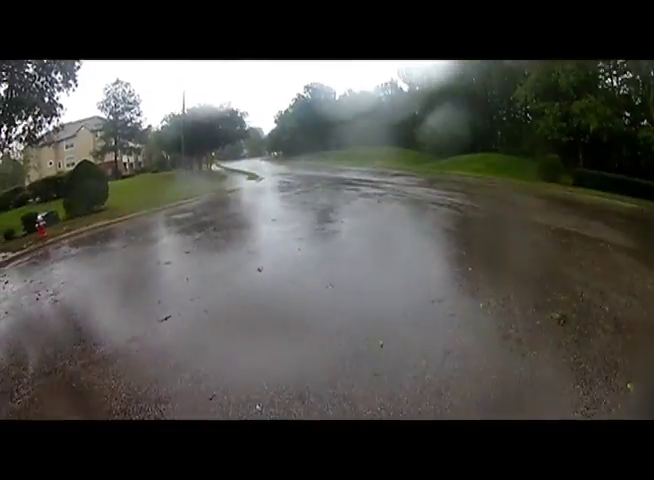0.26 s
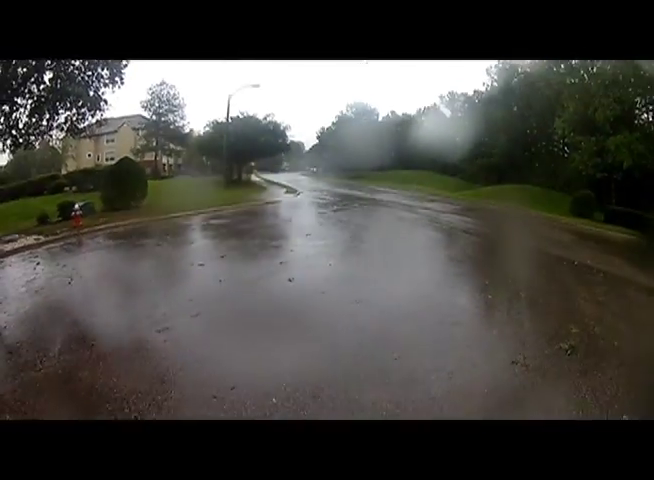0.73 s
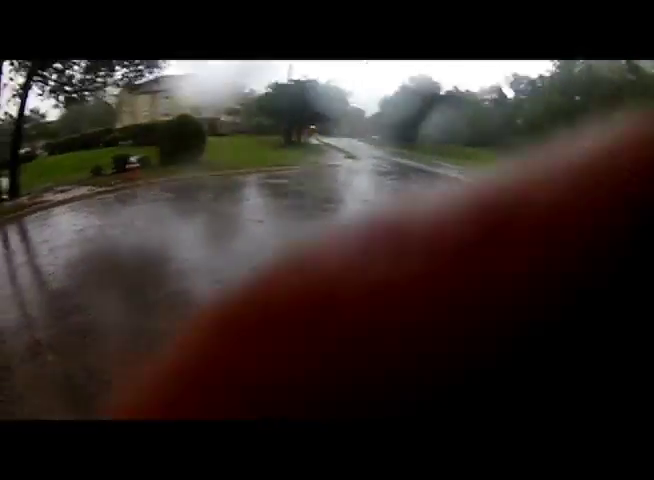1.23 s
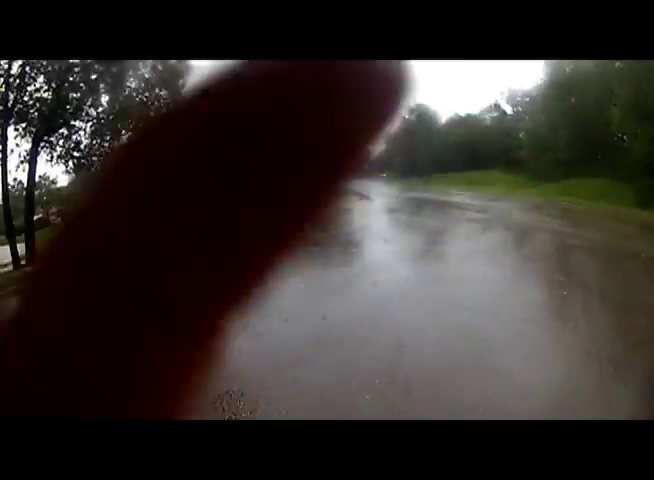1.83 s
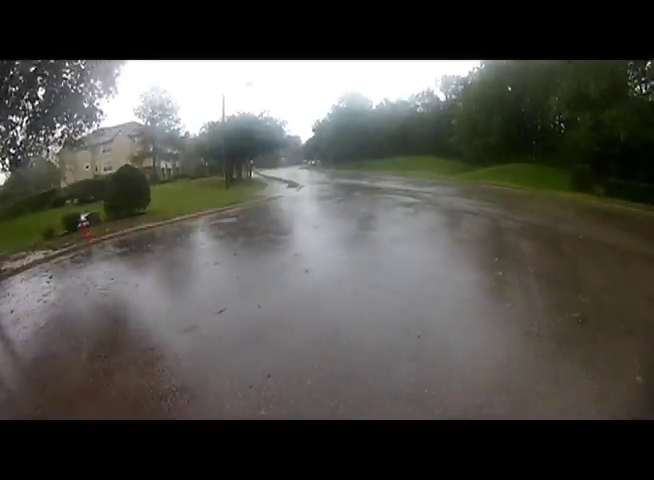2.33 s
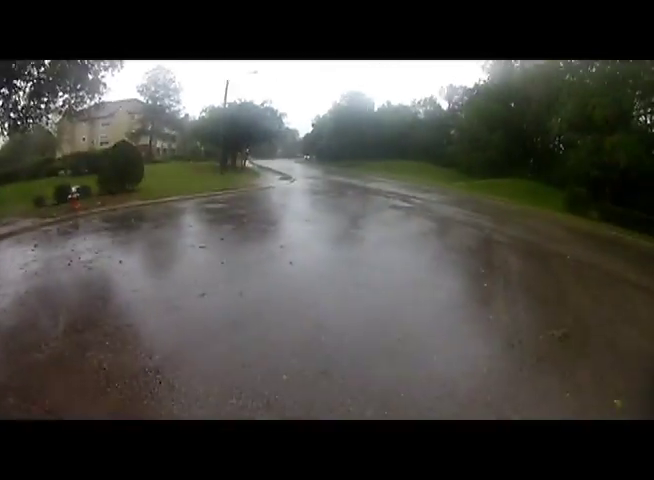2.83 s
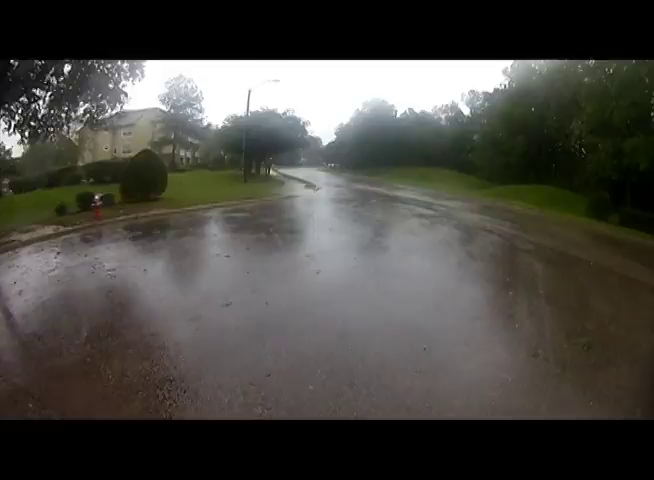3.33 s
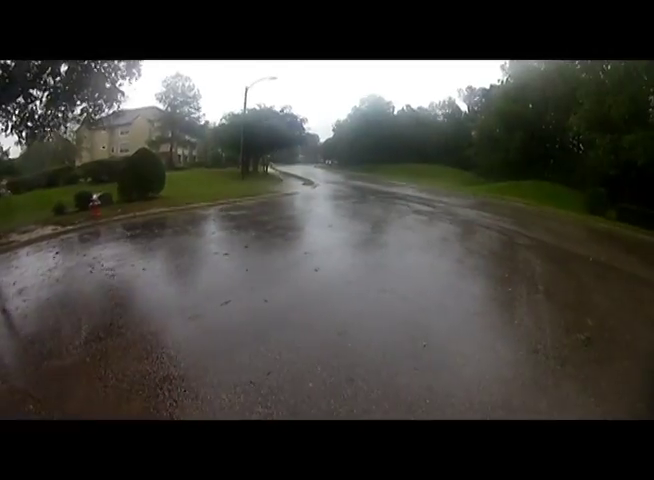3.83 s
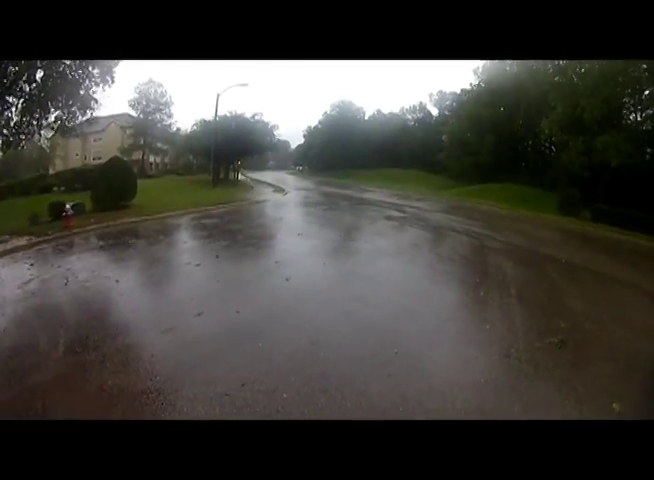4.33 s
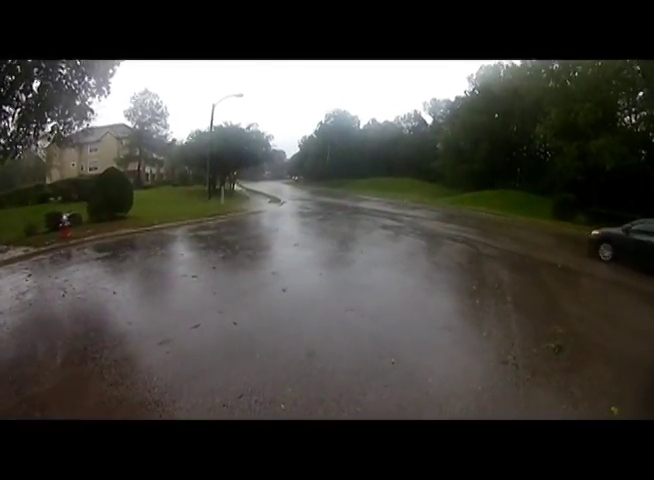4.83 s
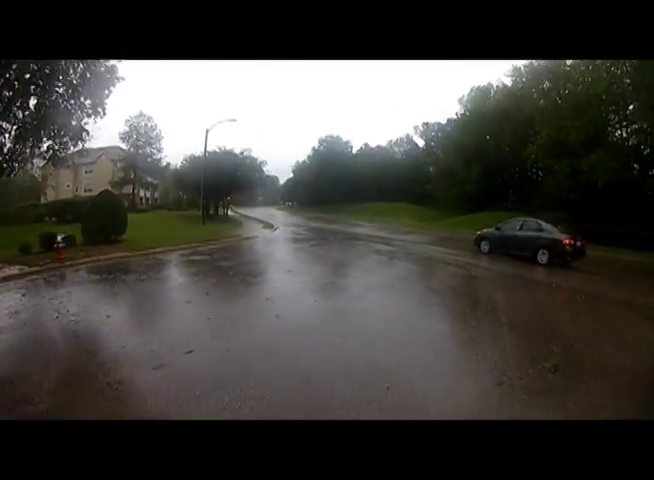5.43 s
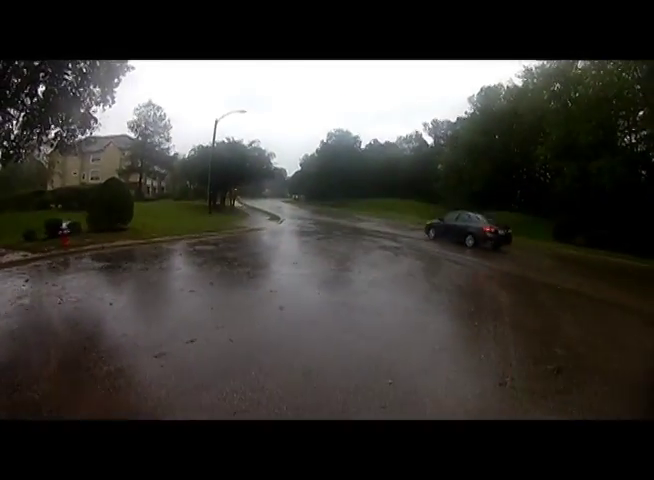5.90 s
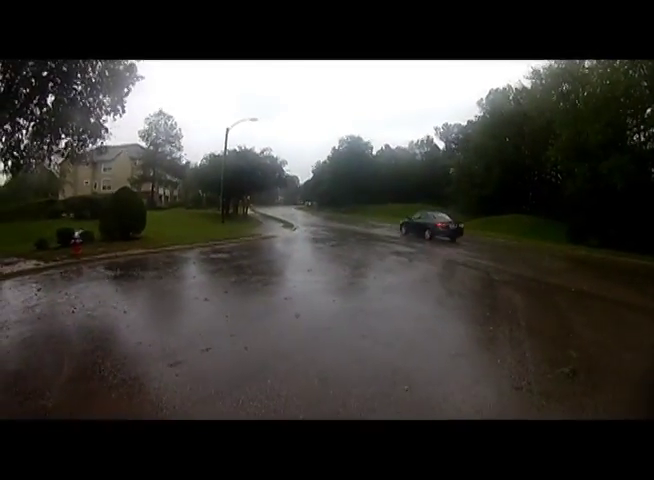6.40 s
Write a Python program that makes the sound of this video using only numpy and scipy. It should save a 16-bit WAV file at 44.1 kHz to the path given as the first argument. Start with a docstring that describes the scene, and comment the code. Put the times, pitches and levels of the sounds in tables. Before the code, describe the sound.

Hollow plastic knocks and dull thumps from fingers on a sealed camera housing, hardest around two to three and a half seconds, over faint muffled rain.

```python
"""Knocks on a sealed housing in the rain

A small camera in a sealed plastic housing is held out in the rain on a quiet street.
Fingers and drops knock on the shell, ringing its damped modes; the grip thumps the air inside,
scrapes and short crunches are stick-slip clicks, and hard blows ring a metal latch and overload the input.
Rain, wet road and wind are shaped noise, muffled by the housing, over faint hiss and hum."""
import sys
import numpy as np
from scipy import signal
from scipy.fft import rfft, irfft, next_fast_len
from scipy.io import wavfile

SR = 44100
rng = np.random.default_rng(int(sys.argv[2]) if len(sys.argv) > 2 else 0)


def file_out(sig):
    """Save sig as 16-bit WAV at sys.argv[1]."""
    # one column per channel
    cols = np.atleast_2d(sig).T
    # limit, then scale
    lim = np.clip(cols, -1, 1)
    pcm = np.round(lim * 32767).astype(np.int16)
    wavfile.write(sys.argv[1], SR, pcm)


N = 293838  # length in samples


def from_db(db):
    """Logarithmic level: decibels to amplitude gain."""
    return 10 ** (np.asarray(db) / 20)


def rms_one(x):
    """Normalisation: the signal scaled to rms 1."""
    return x / np.sqrt(np.mean(x ** 2) + 1e-20)


def add(track, start_s, sound):
    """Superposition: lays a sound on the track from start_s."""
    i = int(round(start_s * SR))
    track[i:i + len(sound)] += sound[:N - i]


def in_time(rows):
    """Linear interpolation: the columns of a time curve, one value per sample."""
    time_s, *columns = np.transpose(rows)
    return [np.interp(np.arange(N) / SR, time_s, column) for column in columns]


def drift(rate_hz):
    """Low-passed noise: a slow random wander of rms 1, computed at every 40th sample."""
    pole = np.exp(-2 * np.pi * rate_hz * 40 / SR)
    noise = rng.standard_normal(N // 40 + 2002)
    slow = signal.lfilter([1], [1, -2 * pole, pole * pole], noise)[2000:]  # drop the settling
    return np.interp(np.arange(N) / 40, np.arange(len(slow)), rms_one(slow))


def coloured(x, spectrum, peaks=()):
    """Spectral shaping: x through a log-frequency curve lifted at resonances, then rms 1."""
    size = next_fast_len(N)
    hz, db = np.transpose(spectrum)
    bins = np.arange(1, size // 2 + 2) * SR / size
    shape_db = np.interp(np.log(bins), np.log(hz), db)
    for centre_hz, width_hz, lift_db in peaks:
        shape_db = shape_db + lift_db / (1 + (2 * (bins - centre_hz) / width_hz) ** 2)
    return rms_one(irfft(rfft(x, size) * from_db(shape_db), size)[:N])


def grains(per_s, spread_db):
    """Random impulse process: clicks at chance moments, of uneven size and sign."""
    size_db = spread_db * np.minimum(rng.exponential(1, N), 5)
    sizes = from_db(size_db) * rng.choice([-1, 1], N)
    return sizes * (rng.random(N) < per_s / SR)


# preamplifier noise, relative spectrum: pitch_hz [Hz], level_db [dB]
HISS_SPECTRUM = [(2000, -14.5), (6000, -8), (11000, -3.5), (13000, -5.5), (16000, -0.5)]
# hum lines, before their slow wander: pitch_hz [Hz], level_db [dB rms]
HUM_LINES = [(120, -70), (240, -72.5)]
HISS_DB = -78  # rms


def electronics():
    """Circuit noise: shaped random hiss and sine lines of hum that wander in level."""
    t = np.arange(N) / SR
    hiss = from_db(HISS_DB) * coloured(rng.standard_normal(N), HISS_SPECTRUM)
    hum = np.zeros(N)
    for pitch_hz, level_db in HUM_LINES:
        gain = np.sqrt(2) * from_db(level_db + 4.1 * drift(2.9))
        hum += gain * np.sin(2 * np.pi * pitch_hz * t)
    return hiss + hum


# rain and wet road, relative spectrum: pitch_hz [Hz], level_db [dB]
RAIN_SPECTRUM = [(88, -38.5), (150, -14), (243, -8), (264, -11.5), (345, -10), (414, -14), (450, -17),
                 (1070, -3.5), (1330, -13), (2150, -17), (8000, -37.5), (10400, -67), (17600, -120)]
# fine spray, relative spectrum: pitch_hz [Hz], level_db [dB]
SPRAY_SPECTRUM = [(2000, -33), (4000, 1.5), (5000, -5), (6500, -10), (7800, -14), (9500, -8.5),
                  (11500, -31)]
# housing resonances that colour the outside air: pitch_hz [Hz], width_hz [Hz], lift_db [dB]
CAVITY_RESONANCES = [(1093, 90, 7.5), (1550, 60, 4), (2126, 50, 7), (2520, 70, 8), (2880, 400, 6),
                     (3980, 150, 8.5), (4590, 420, 7.5), (5530, 510, 4.5)]
# levels of the outside air: time_s [s], rain_and_road_db [dB rms], spray_db [dB rms]
OUTSIDE_LEVELS = [(0, -68.5, -78), (.3, -63.5, -77.5), (1.0, -62, -80), (1.35, -57.5, -78), (2.0, -56, -74),
                  (2.4, -61, -77), (3.1, -56, -78.5), (3.25, -57.5, -69.5), (3.5, -59, -70),
                  (3.9, -59.5, -72), (4.3, -59, -88), (5.2, -59, -96), (5.9, -59.5, -78),
                  (6.66, -61.5, -81)]


def outside_air():
    """Resonant transmission: rain, wet road and spray as noise coloured by the housing cavity."""
    rain_db, spray_db = in_time(OUTSIDE_LEVELS)
    wash = rng.standard_normal(N) * from_db(.8 * drift(20.0))
    patter = wash + .3 * rms_one(grains(260.0, spread_db=5.0))  # small drops over the wash
    rain = coloured(patter, RAIN_SPECTRUM, CAVITY_RESONANCES)
    spray = coloured(rng.standard_normal(N), SPRAY_SPECTRUM, CAVITY_RESONANCES)
    return from_db(rain_db) * rain + from_db(spray_db) * spray


# rumble of wind and grip, relative spectrum: pitch_hz [Hz], level_db [dB]
RUMBLE_SPECTRUM = [(12, -3.5), (35, -2), (80, -7), (140, -15), (300, -37.5), (600, -72.5)]
# creeping skin, relative spectrum: pitch_hz [Hz], level_db [dB]
CREEP_SPECTRUM = [(80, -18.5), (240, -1), (500, -3), (900, 1.5), (1300, -12.5), (3000, -40), (6000, -59)]
# unrest of the hand and wind, as rumble: time_s [s], level_db [dB rms]
UNREST_LEVELS = [(0, -60), (.91, -51), (1.24, -32.5), (1.47, -46), (1.8, -33.5), (2.17, -50.5), (2.56, -35),
                 (2.67, -42.5), (2.86, -36.5), (3.17, -39.5), (3.3, -52), (3.5, -47.5), (3.62, -37),
                 (4.06, -56.5), (4.3, -34.5), (4.5, -50.5), (5.62, -52), (5.92, -46), (6.66, -56.5)]
CREEP_DB, CREEP_FOLLOWS = -59.5, .4  # level at a rumble of -49.5 dB; share of the rumble's swing


def unrest():
    """Amplitude modulation: lumpy low noise of wind and grip, and clicks of skin creeping on the shell."""
    rumble_db, = in_time(UNREST_LEVELS)
    creep_db = CREEP_DB + CREEP_FOLLOWS * (rumble_db + 49.5)
    lumps = rng.standard_normal(N) * from_db(1.5 * drift(22.0))
    clicks = grains(900.0, spread_db=3.0) * from_db(3.5 * drift(14.0))
    rumble, creep = coloured(lumps, RUMBLE_SPECTRUM), coloured(clicks, CREEP_SPECTRUM)
    return from_db(rumble_db) * rumble + from_db(creep_db) * creep


# modes of the shell before the hand damps them, lowest first: pitch_hz [Hz], level_db [dB], t60_s [s]
SHELL_MODES = [(241.2, 0, 0.072), (408, -2.5, 0.027), (493, 0.5, 0.021), (660, -1.5, 0.022),
               (855, -3.5, 0.023), (1048.5, -2.5, 0.03), (1300, -8.5, .028), (1478, -8, 0.026),
               (1720, -10.5, .025), (2266, -8, .02), (2530, -15, .016), (2930, -16, .014),
               (3474, -12, 0.014), (3730, -34, .02), (4400, -22, 0.0062), (5400, -30, 0.016),
               (6500, -26, 0.0038)]


def shell(force, longest_s):
    """Modal filtering: a running force through two-pole resonators, gripped so none rings long."""
    out = 0
    for k, (pitch_hz, level_db, t60_s) in enumerate(SHELL_MODES):
        r = from_db(-60 / (min(t60_s, longest_s) * SR))
        w = 2 * np.pi * pitch_hz / SR
        ring = signal.lfilter([0, np.sin(w)], [1, -2 * r * np.cos(w), r * r], force + 1e-18)
        out = out + (-1) ** k * from_db(level_db) * ring  # alternating sign
    return out


# what the housing passes of a sharp contact, hollow near 8 kHz: pitch_hz [Hz], level_db [dB, relative]
CONTACT_SPECTRUM = [(1500, -11), (3500, 2), (6500, -4.5), (7800, -20.5), (9500, -11), (12000, -18),
                    (16000, -29)]
# fingers scraping on the shell, and short crunches inside the hard blows, levels before the fades:
# start_s [s], end_s [s], level_db [dB rms], brightness_hz [Hz, low-pass corner], wet_hiss_db [dB rms]
SCRAPES_AND_CRUNCHES = [(1.023, 1.053, -50, 1510, -81), (1.181, 1.185, -29, 925, -51.5),
                        (1.192, 1.239, -31, 1490, -67), (1.278, 1.348, -40.5, 1800, -63),
                        (1.356, 1.419, -28, 1190, -85), (1.52, 1.586, -40.5, 1590, -68.5),
                        (1.673, 1.713, -21, 1200, -55.5), (1.766, 1.779, -36, 1534, -62),
                        (1.879, 1.914, -40.5, 2960, -78), (1.935, 1.992, -42, 2300, -82),
                        (2.007, 2.03, -45, 4040, -65), (2.125, 2.147, -18.5, 1300, -47),
                        (2.36, 2.388, -53, 900, -68), (2.554, 2.625, -42.5, 1220, -75),
                        (2.776, 2.883, -47.5, 1190, -86.5), (2.926, 3.006, -46, 880, -80),
                        (3.003, 3.016, -7.5, 1480, -49.5), (3.038, 3.052, -22, 710, -66.5),
                        (3.105, 3.185, -35, 503, -81), (3.568, 3.61, -29.5, 900, -72.5),
                        (3.658, 3.75, -50.5, 1100, -73), (3.802, 3.858, -49, 786, -78),
                        (4.35, 4.443, -45, 1190, -75), (5.942, 6.023, -47.5, 497, -85),
                        (6.016, 6.061, -45, 2160, -68), (6.056, 6.093, -46, 895, -84)]


def scrapes_and_crunches(slips_per_s, fade_s):
    """Stick-slip friction: bursts of uneven clicks drive the shell, with a hiss of squeezed water."""
    slips = grains(slips_per_s, spread_db=2.5) * from_db(3.5 * drift(60.0))
    force = shell(slips, longest_s=0.01)
    wet, out = coloured(rng.standard_normal(N), CONTACT_SPECTRUM), np.zeros(N)
    for start_s, end_s, level_db, brightness_hz, wet_hiss_db in SCRAPES_AND_CRUNCHES:
        t = np.arange(int((end_s - start_s + 3 * fade_s) * SR)) / SR
        release = np.exp(-np.maximum(t - (end_s - start_s), 0) / fade_s)
        envelope = np.clip(t / fade_s, 0, 1) * release
        first = int(start_s * SR)
        span = slice(first, first + len(t))
        low_pass = signal.butter(3, brightness_hz, fs=SR)
        clicks = rms_one(signal.lfilter(*low_pass, force[span]))
        add(out, start_s, envelope * (from_db(level_db) * clicks + from_db(wet_hiss_db) * wet[span]))
    return out


# modes of a metal latch: pitch_hz [Hz], level_db [dB], t60_s [s]
LATCH_MODES = [(2075, -9, .25), (2120, -3, .22)]
# blows that set it ringing, level added to that of each mode: start_s [s], level_db [dB]
LATCH_STRIKES = [(1.2, -44), (1.506, -34), (1.701, -40), (1.884, -40), (2.142, -41.5), (2.883, -33),
                 (3.011, -30), (3.596, -48.5), (4.281, -46)]


def latch():
    """Beating: two close decaying modes interfere, in a latch that rattles loosely in its seat."""
    out, t = np.zeros(N), np.arange(SR // 3) / SR
    ring = np.zeros(len(t))
    for pitch_hz, level_db, t60_s in LATCH_MODES:
        ring += np.sin(2 * np.pi * pitch_hz * t) * from_db(level_db - 60 * t / t60_s)
    for start_s, level_db in LATCH_STRIKES:
        add(out, start_s, from_db(level_db) * ring * np.minimum(t / 0.0044, 1))  # 4.4 ms onset
    return out * from_db(2.5 * drift(45.0))  # the rattle, as a flutter in level


# grip squeezing the air inside, level before the onset and decay: start_s [s], level_db [dB],
# pitch_hz [Hz], decay_cycles [cycles to fall 60 dB], push [+1 push, -1 release]
GRIP_THUMPS = [(0.889, -13, 71, 3, -1), (1.168, -18, 92.6, 19, -1), (1.2, -6.5, 90.4, 9, 1),
               (1.258, -13.5, 94, 6.5, 1), (1.288, -20, 110, 5.5, -1), (1.476, -20, 87, 3, 1),
               (1.497, -8, 157, 4, -1), (1.694, 8, 80.7, 6, 1), (1.704, 7.5, 204.6, 7, -1),
               (1.781, -13.5, 89.5, 4, 1), (1.813, -24.5, 41.2, 4, 1), (1.91, -15, 46, 3.5, -1),
               (2.031, -19, 46, 2, -1), (2.085, -36, 46, 16.5, 1), (2.127, 1.5, 84.6, 9, 1),
               (2.142, 13.5, 189, 4, 1), (2.37, -16.5, 86.5, 6.5, 1), (2.442, -13.5, 48, 2, 1),
               (2.594, -10, 80, 3.5, 1), (2.609, -10.5, 53.7, 7, -1), (2.63, -2, 72, 1.5, 1),
               (2.815, 9, 64, 3, 1), (2.886, -17.5, 130, 9, 1), (2.922, -25.5, 39, 8, -1),
               (3.006, 15, 169.1, 6, -1), (3.024, -6.5, 39, 4.5, -1), (3.171, -1, 60, 1, -1),
               (3.461, -3, 63, 4, 1), (3.586, 2.5, 154, 6.5, -1), (3.597, 14.5, 140.6, 3.5, -1),
               (4.108, -19, 48.2, 4, 1), (4.176, -24, 30.3, 1.5, 1), (4.225, -12, 60, 2.5, 1),
               (4.273, -21, 45, 2.5, 1), (4.28, 5.5, 146, 1.5, 1), (4.413, -3, 147, 1.5, 1),
               (4.583, -25.5, 70, 1.5, -1), (4.781, -24.5, 55, 1, 1), (5.665, -29, 80.2, 2, 1),
               (5.766, -13.5, 53, 3, 1), (5.879, -7, 79, 1.5, -1), (6.149, -19, 70, 1, -1)]


def thumps(settle):
    """Damped oscillation: the sealed air swings a few times, then the grip stills it ever faster."""
    out, t = np.zeros(N), np.arange(SR // 4) / SR
    for start_s, level_db, pitch_hz, decay_cycles, push in GRIP_THUMPS:
        cycles = pitch_hz * t
        swing = np.sin(2 * np.pi * cycles) * (1 - np.exp(-3.5 * cycles))
        swing = swing * from_db(-60 * (cycles / decay_cycles) ** settle)
        add(out, start_s, np.sign(push) * from_db(level_db) * swing)
    return out


DROP_COUNT, DROP_DB, DROP_SCATTER_DB = 22, -49.5, 4.5  # mean level and its scatter
DROP_HZ, DROP_OCTAVES, DROP_LOWEST_DB, DROP_SNAP_DB = 1020, 1, -24, -28


def small_drops():
    """Random arrivals: small drops at chance moments, as rows like those of the knocks."""
    starts_s, sizes = rng.random(DROP_COUNT) * N / SR, rng.standard_normal(DROP_COUNT)
    return [(start_s, DROP_DB + DROP_SCATTER_DB * size, DROP_HZ, DROP_OCTAVES, DROP_LOWEST_DB, DROP_SNAP_DB)
            for start_s, size in zip(starts_s, sizes)]


# knocks on the shell: start_s [s], level_db [dB, peak of the upper modes], pitch_hz [Hz, favoured],
# spread_octaves [octaves, at least 0.3 is used], lowest_db and snap_db [dB relative to level_db]
SHELL_KNOCKS = [(0.77, -40, 1040, 0.41, -27, -33), (.864, -42, 904, 0.45, 10, -33),
                (.889, -14.5, 615, 0.24, 0, -68), (.951, -30.5, 490, 0.25, -1, -43),
                (1.042, -33, 560, 1.9, 1.5, -36), (1.17, -15, 850, 0.89, -1.5, -14),
                (1.199, -9, 750, 1.4, 0.5, -23), (1.22, -20.5, 720, 0.4, -3, -47),
                (1.29, -12.5, 610, 0.76, -2, -42), (1.349, -20.5, 540, 0.53, -31, -48),
                (1.474, -17, 428, 1.1, 0, -50), (1.493, -14, 404, 0.7, -6, -45),
                (1.506, -4.5, 1120, 1.09, -24.5, -36.5), (1.594, -27.5, 1420, 0.81, -27, -16.5),
                (1.686, -15, 1030, 0.54, -2, -31), (1.701, 2, 510, 1.05, 1.1, -17),
                (1.707, -22, 401, 1.9, 8.5, -30), (1.779, -31, 890, 1.2, 4, -19),
                (1.873, -22.5, 570, 0.69, -6, -36), (1.884, -3.5, 1280, 1.26, -23, -35.5),
                (2.123, -14.5, 980, 0.49, -11, -46), (2.142, 6, 397, 0.81, -1.5, -31.5),
                (2.15, -21, 575, 0.47, 14.5, -20.5), (2.366, -29, 860, 0.39, -4.5, -28),
                (2.399, -38.5, 826, .69, -3, -42), (2.491, -32, 446, 0.79, -5.5, -42),
                (2.546, -40, 1060, 0.85, -26, -36), (2.594, -20.5, 401, 0.89, -1, -29),
                (2.604, -18.5, 407, 1.9, -1.5, -27), (2.639, -9.5, 550, 0.66, -1, -52),
                (2.652, -23, 546, 1.4, 7, -20.5), (2.817, -10.5, 407, 1.04, -4, -25),
                (2.883, -2.5, 1010, 0.77, -17.5, -29), (2.915, -6, 385, 1.1, -12.5, -59),
                (3.007, 7.5, 397, 1.4, -9, -27.5), (3.017, 8.5, 620, 1.56, -7.5, -32.5),
                (3.024, -6.5, 885, 1.1, -6.5, -39), (3.056, 1, 490, 0.34, -38, -38),
                (3.172, -17, 450, 0.55, -8, -37), (3.383, -45.5, 1060, 0.83, -29, -34),
                (3.46, -21.5, 487, 0.88, -1, -34), (3.58, -18.5, 638, .64, -3.5, -46.5),
                (3.587, -6, 401, 0.84, 14, -33), (3.596, 7.5, 400, .6, -27, -43),
                (3.604, 0, 500, 1.05, -11, -36), (3.816, -36, 457, 0.67, 1.5, -26.5),
                (3.875, -46.5, 1120, 0.42, -15, -26), (4.076, -46, 1060, 1.3, 15.5, -27),
                (4.115, -28.5, 401, 0.69, 2, -44), (4.17, -35.5, 502, 0.79, -24, -48),
                (4.229, -34, 470, 0.5, -2, -39), (4.282, -6, 600, 1.16, -14, -34.5),
                (4.342, -31.5, 401, 0.91, 8.5, -45), (4.359, -23.5, 720, 0.8, -3, -53),
                (4.385, -23.5, 654, .9, 11, -27), (4.398, -17.5, 401, 1.76, -28, -42),
                (4.412, -14.5, 450, 0.61, -1.5, -45), (4.427, -26, 401, 0.87, -30, -44),
                (4.582, -44.5, 1050, 1.6, 12.5, -35), (4.778, -46.5, 498, 1.3, -1, -27),
                (5.004, -44, 813, 0.63, -28.5, -22), (5.17, -40.5, 904, 0.66, -17, -17),
                (5.236, -40, 886, 1.27, -12.5, -34), (5.666, -40, 756, 0.94, 7, -24.5),
                (5.757, -36, 428, 0.39, 4, -17), (5.879, -22, 1070, 0.45, 6.5, -25.5),
                (6.152, -36.5, 820, 0.37, 6, -49)]
# a sharper blow, wider in spread, comes from a firmer hand and is damped more;
# so is a blow under the palm, which drives the lowest mode above the rest
DAMPING, DAMPING_PER_OCTAVE, DAMPING_PER_LOWEST_DB = 0.77, 0.25, 0.02


def knocks(uneven_db, detune, rise_cycles, snap_t60_s):
    """Modal excitation: place and softness of a blow choose the modes; the hand damps and detunes them."""
    out, snaps, t = np.zeros(N), np.zeros(N), np.arange(SR // 4) / SR
    mode_hz, mode_db, t60_s = np.transpose(SHELL_MODES)[:, :, None]
    rows = SHELL_KNOCKS + small_drops()
    luck = rng.standard_normal((len(rows), 3, len(SHELL_MODES), 1))
    for row, (uneven, late, bend) in zip(rows, luck):
        start_s, level_db, favoured_hz, spread, lowest_db, snap_db = row
        spread = max(spread, .3)
        damping = DAMPING + DAMPING_PER_OCTAVE * spread + DAMPING_PER_LOWEST_DB * max(lowest_db, 0)
        decay_s = t60_s / np.clip(damping, .3, 3)
        hz = mode_hz * (1 + detune * bend * (mode_hz > mode_hz[0]))  # the lowest mode stays put
        distance = np.log2(hz / favoured_hz) / spread
        fall_db = np.where(distance > 0, 5.0 * distance, -7.5 * distance)
        ring_db = mode_db - fall_db + uneven_db * uneven
        rings = np.sin(2 * np.pi * hz * t + 0.94 * late) * from_db(-60 * t / decay_s)
        # a duller, narrower blow presses on for longer
        press = np.sin(np.pi / 2 * np.minimum(t * favoured_hz * spread / rise_cycles, 1)) ** 2
        upper = np.sum(from_db(ring_db[1:]) * rings[1:], axis=0) * press
        lowest = from_db(lowest_db) * rings[0] * np.minimum(t * hz[0], 1)
        add(out, start_s, from_db(level_db) * (upper / np.abs(upper).max() + lowest))
        add(snaps, start_s, press * from_db(level_db + snap_db - 60 * t / snap_t60_s))
    return out + snaps * coloured(rng.standard_normal(N), CONTACT_SPECTRUM)


def scene():
    """Superposition: outside air, handling and blows, with the circuit's hiss and hum, as one channel."""
    background = electronics() + outside_air() + unrest()
    handling = scrapes_and_crunches(slips_per_s=2700.0, fade_s=.008) + latch() + thumps(settle=1.445)
    blows = knocks(uneven_db=3.5, detune=.03, rise_cycles=0.72, snap_t60_s=0.019)
    return (background + handling + blows)[None]


CUTOFF_HZ = 16000  # where the low-pass reaches 50 dB of loss


def record(dry):
    """Saturation and band limiting: the input clips with a tight knee, then the top is cut."""
    clipped = .98 * dry / (1 + np.abs(dry) ** 8) ** (1 / 8)
    low_pass = signal.cheby2(20, 50, CUTOFF_HZ, fs=SR, output="sos")
    return signal.sosfilt(low_pass, clipped)


dry = scene()
out = record(dry)
file_out(out)
```